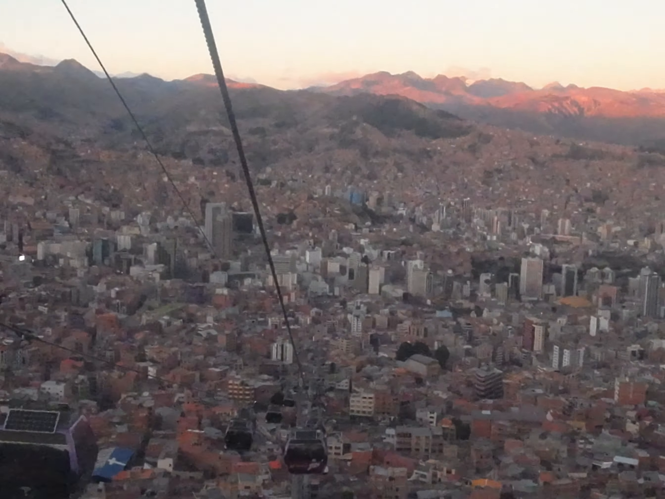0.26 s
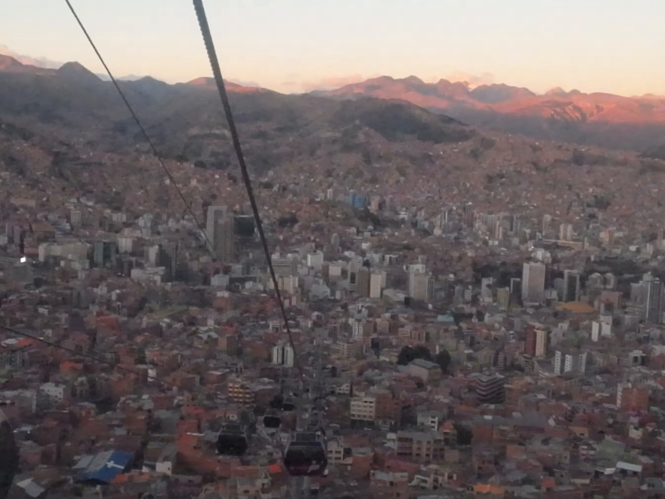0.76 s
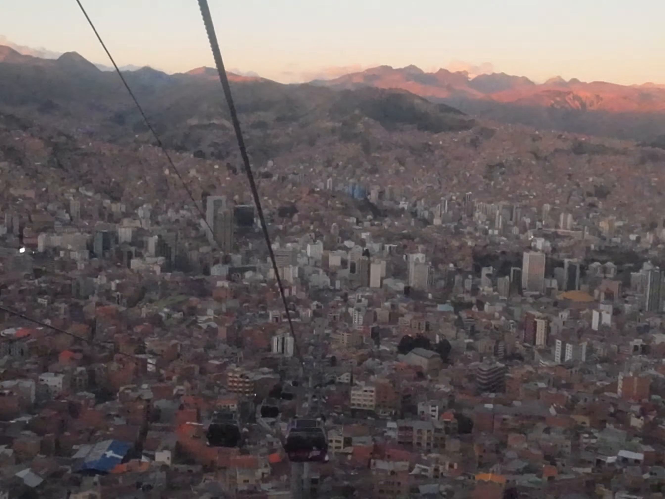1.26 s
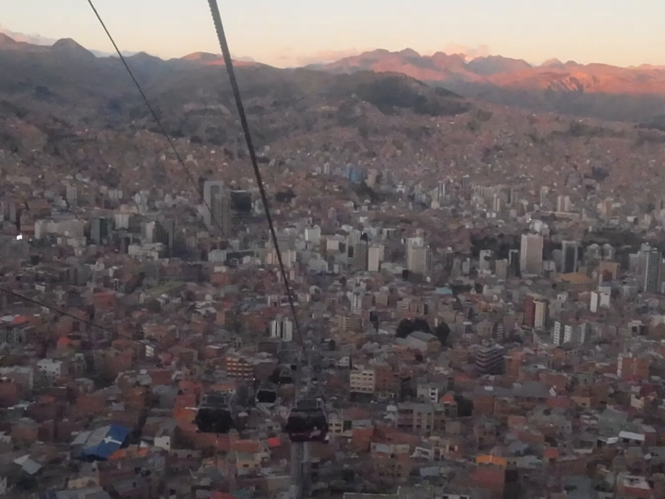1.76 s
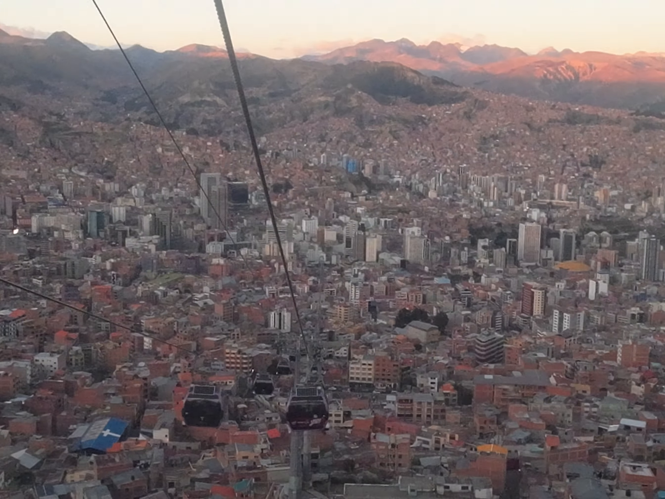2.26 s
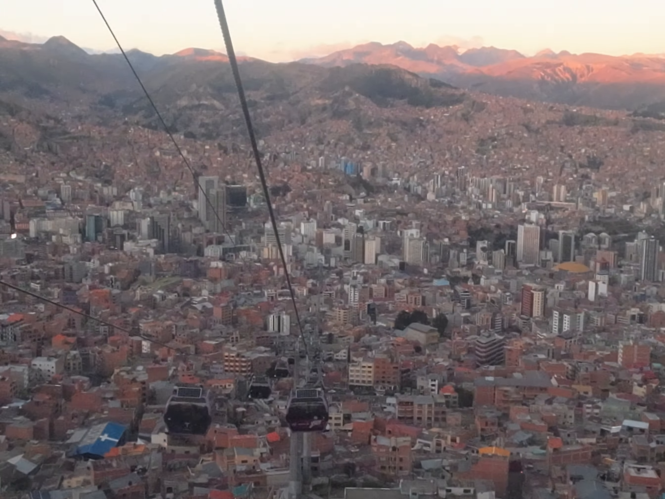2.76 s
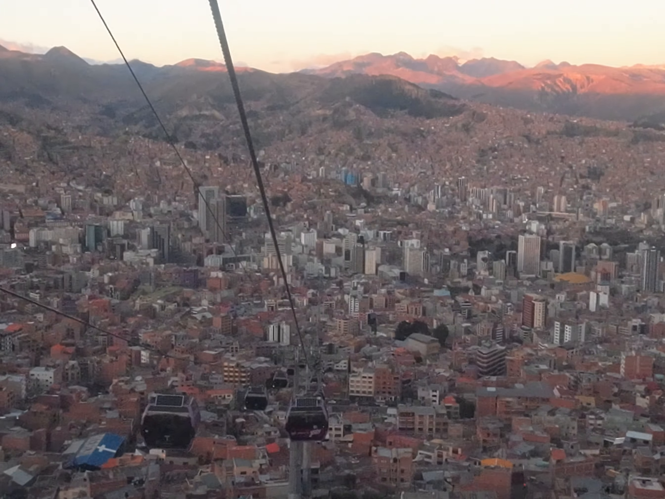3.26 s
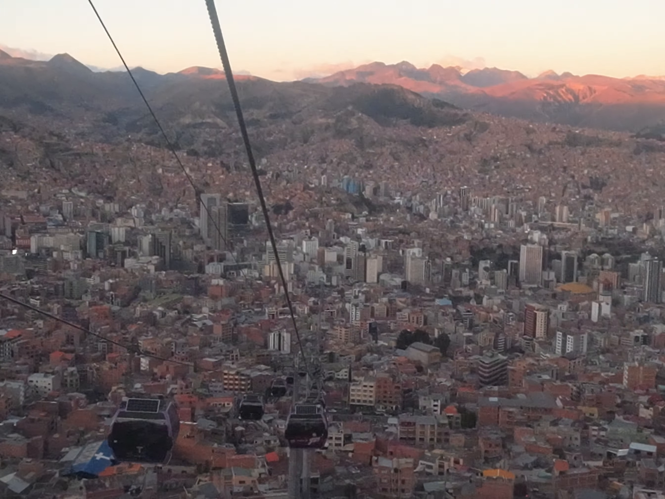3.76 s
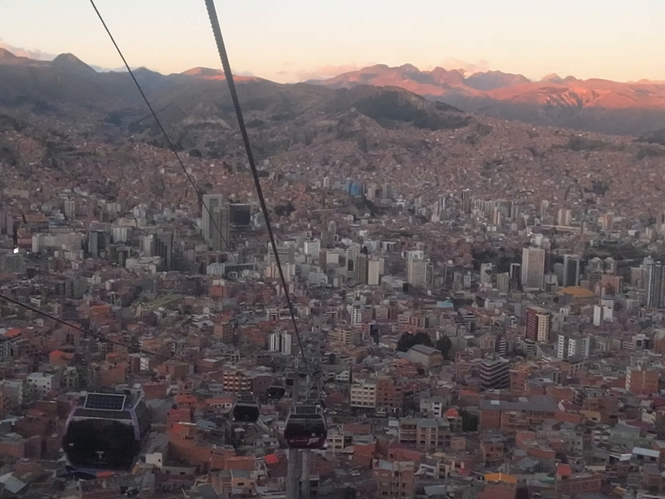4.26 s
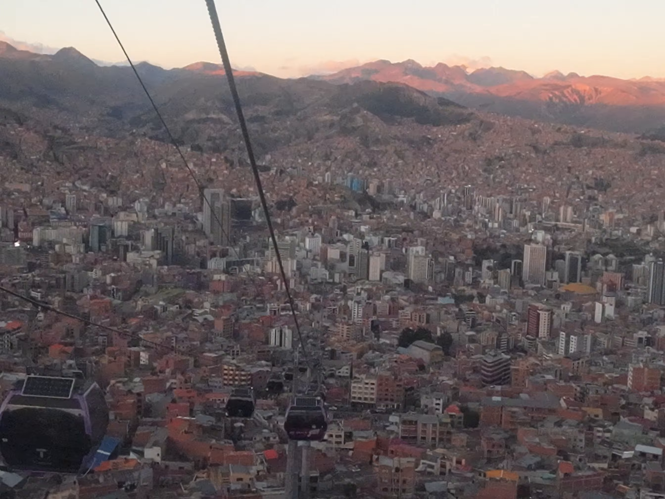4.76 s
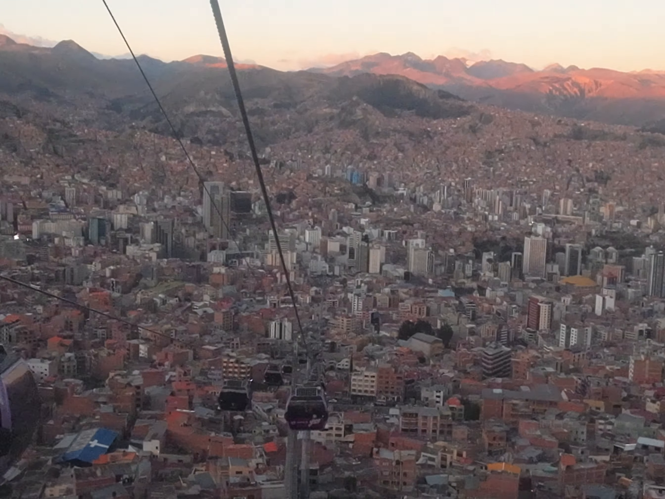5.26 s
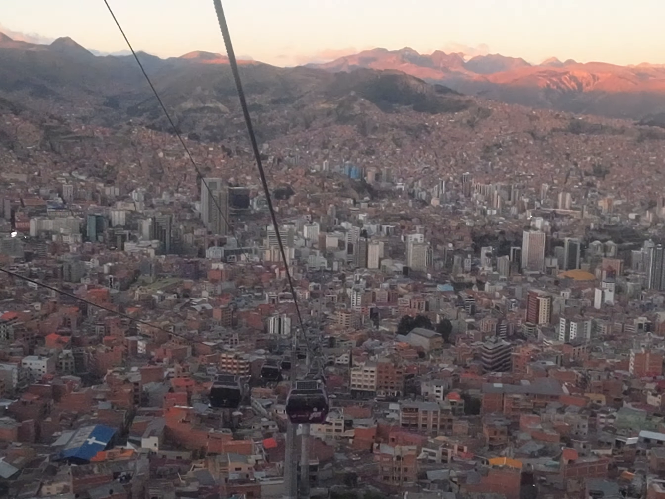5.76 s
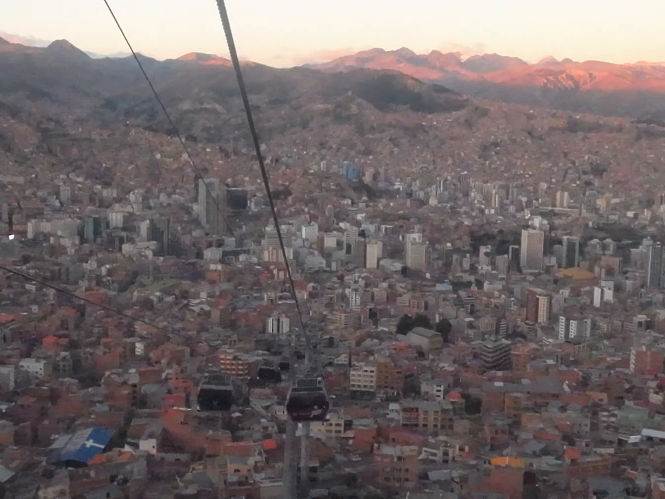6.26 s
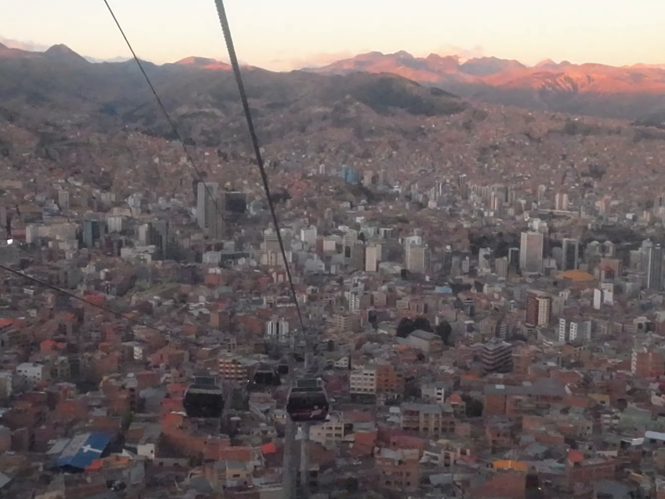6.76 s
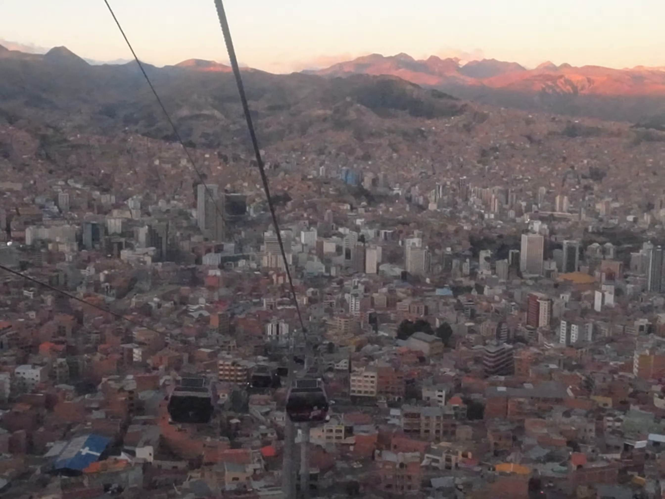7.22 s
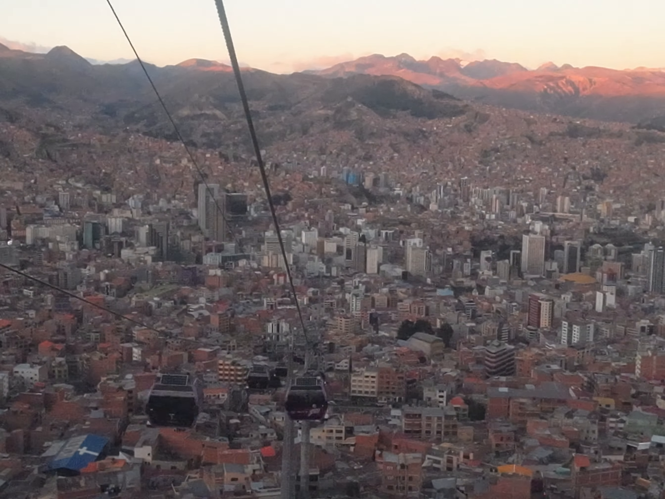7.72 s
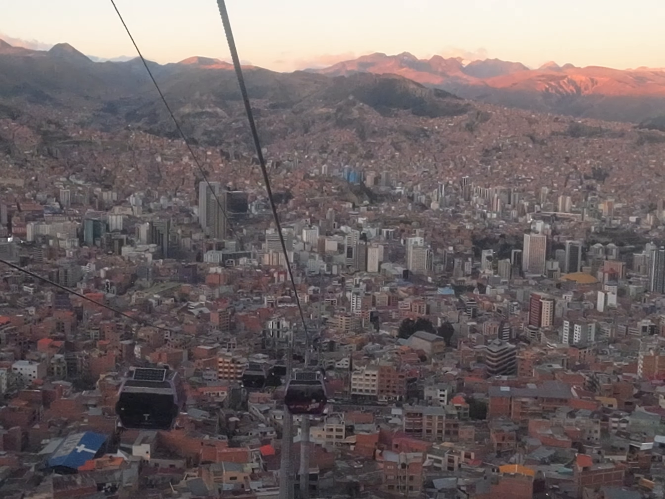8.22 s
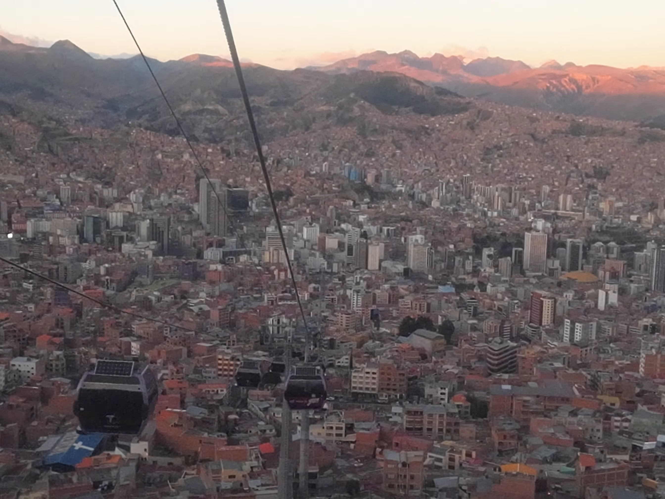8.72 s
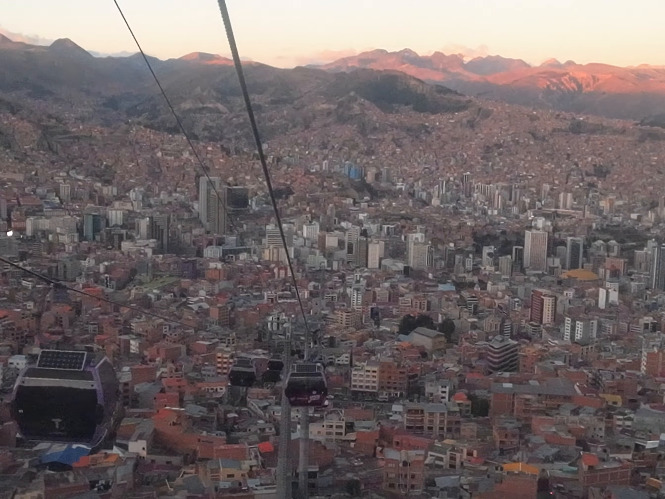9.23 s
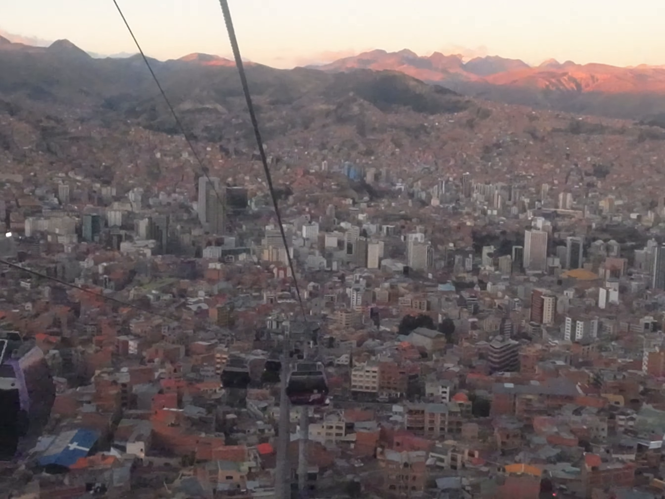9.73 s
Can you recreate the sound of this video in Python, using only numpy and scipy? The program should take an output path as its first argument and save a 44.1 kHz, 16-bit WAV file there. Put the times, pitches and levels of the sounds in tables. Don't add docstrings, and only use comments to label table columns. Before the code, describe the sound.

Heard from inside a small gondola cabin by a handheld stereo microphone: a deep shaking hum, slowly beating rope tones and a dull hollow drone of the shell. Just after six seconds a jolt sets loose panels and fittings rattling rapidly for about a second. The rope hum is thinner afterwards, with scattered trim ticks, a sharper click past eight seconds, and soft cloth rustling close by.

```python
import sys
import numpy as np
from scipy import signal
from scipy.fft import rfft, irfft, next_fast_len
from scipy.io import wavfile
from scipy.ndimage import uniform_filter1d

SR = 44100
rng = np.random.default_rng(int(sys.argv[2]) if len(sys.argv) > 2 else 0)


def file_out(sig):
    cols = np.atleast_2d(sig).T
    lim = np.clip(cols, -1, 1)
    pcm = np.round(lim * 32767).astype(np.int16)
    wavfile.write(sys.argv[1], SR, pcm)


def invert_db(level):
    return 10 ** (np.asarray(level, dtype=float) / 20)


N = 440559
T = np.arange(N) / SR
M = next_fast_len(N)
HZ = np.arange(M // 2 + 1) * SR / M + 1e-3

# time in seconds, level in dB.
SHAKE_LEVEL = [(0, -32), (.8, -21), (1.7, -28.5), (2.5, -21.5), (4.05, -31.5), (4.4, -17.5), (6.05, -21.5),
               (6.22, -25), (6.33, -13), (6.56, -11), (6.7, -20.5), (6.9, -9.5), (7.27, -27.5), (7.48, -17),
               (7.63, -33), (7.76, -18), (8.43, -26), (9.35, -22.5)]
# pitch in Hz, sag in Hz per second before the rise,
# late rise in Hz, level against its control in dB, wander in dB. All tables of tones share these columns.
SHAKE_TONES = [(30.12, 0.00082, 0.0051, -1, 1.0)]
SWAY_TONES = [(26.55, 0.00043, 0.45, -0.8, 5)]
SWAY_DB, SWAY_FADE_DB, SWAY_SHARE = -28, -6.5, .15
RISE_FROM_S, RISE_S, DRIFT_SHARE = 6.0, 3, .0025

# time in seconds, main strands in dB, upper strand in dB.
ROPE_LEVEL = [(0, -19, -22.5), (.6, -22, -35), (.95, -20.5, -21), (1.25, -21.5, -31), (1.55, -15, -40),
              (2.15, -21.5, -27.5), (2.65, -21.5, -21.5), (3.1, -16.5, -37.5), (4.05, -22.5, -34),
              (4.7, -22, -27.5), (5, -20.5, -38.5), (5.65, -28, -26), (6.25, -30.5, -34), (6.9, -32, -38),
              (7.2, -37, -30.5), (8.1, -34.5, -34), (9.1, -30.5, -34.5), (9.99, -33.5, -42)]
# time in seconds, lower overtone in dB, higher overtone in dB.
OVERTONE_LEVEL = [(0, -24.5, -37.5), (.35, -26, -36.5), (.65, -34.5, -37), (.95, -27.5, -34),
                  (1.55, -29, -33), (2.5, -35, -33.5), (3.1, -31, -39), (3.78, -24, -39.5),
                  (4.06, -39, -34), (4.7, -40.5, -39.5), (5.3, -32, -33.5), (5.95, -31.5, -36),
                  (6.6, -43, -37.5), (7.5, -42, -36.5), (8.05, -42, -50), (8.6, -41.5, -43),
                  (9.05, -37, -30), (9.99, -49.5, -33.5)]
# time in seconds, level in dB.
TOP_OVERTONE_LEVEL = [(0, -42), (2, -51.5), (5, -47), (5.6, -41.5), (6.5, -37.5), (7, -49.5), (8, -29.5),
                      (8.5, -35.5), (9, -47.5), (9.99, -55)]
STRAND_TONES = [(88.08, .3, 3.225, -1, 2.1), (83.3, .3, 1.495, -6, 3)]
UPPER_TONES = [(97.23, 0.0, 0.33, 0.0, 2.2)]
LOW_OVERTONE_TONES = [(175.1, .45, 0.624, -1, 2.5), (170, 0.49, 1.5, -10.5, 1.4)]
HIGH_OVERTONE_TONES = [(180.2, .25, 1.58, 0.00057, 1)]
TOP_TONES = [(183.5, 0.00021, 0.0022, 0.002, 0.97)]
THIRD_TONES = [(269, .3, 3.05, -0.5, 3), (261, .5, 3.3, -6, 3)]
THIRD_DB, THIRD_SHARE = -57.5, 0.89

# frequency in Hz, density in dB
# per Hz.
SHELL_DENSITY = [(15, 12), (38, 2), (48, 7), (70, 6), (90, 12), (130, -2), (160, -5), (185, 6),
                 (120, -20.5), (200, -3.5), (231, -9.5), (321, -14), (471, -14), (690, -16.5), (798, -24),
                (1130, -25.5), (2420, -45), (2850, -46), (8500, -58.5), (12900, -63.5), (15500, -93)]
# frequency in Hz, width in Hz, level above the drone in dB.
PANEL_MODES = [(107.8, 2.5, 6.3), (146.2, 11, 8.9), (268, 11, 1.9), (365, 16, 2.6), (528, 10, 1.6),
               (678.3, 35, 10.4), (717, 26, 9.4), (903, 11, 6.5), (1160, 23, 1.6), (1240, 18, 8),
               (2127, 120, 6), (1335, 11, 5), (2820, 54, 3.6), (3840, 520, 1.9)]
# time in seconds, drone strength in dB.
LOAD = [(0, -5), (.3, 0), (.55, 1.5), (1.7, 0), (2, -5), (2.3, 3), (3, -3.5), (3.3, 5.5), (3.8, 3),
        (4.15, -4.5), (5, 0), (5.35, 4), (5.7, -1), (7.5, -1), (7.9, 0), (8.75, 0.5), (9.3, -3.5),
        (9.99, 0)]
# time in seconds, peak in dB.
NUDGES = [(0.409, -35.5), (0.597, -36.5), (0.648, -42.5), (0.863, -39.5), (1.076, -41.5), (1.228, -42.5),
          (1.351, -39.5), (2.176, -33.5), (2.386, -38.5), (2.52, -33.5), (2.644, -34), (2.73, -39.5),
          (2.858, -45.5), (3.255, -36.5), (3.448, -37), (3.554, -41), (3.613, -38), (3.733, -41),
          (4.031, -40.5), (4.225, -42), (4.371, -40), (4.452, -34), (4.646, -39), (5.286, -33),
          (5.414, -36), (5.553, -40.5), (5.63, -42), (5.82, -48), (7.18, -42), (7.33, -43), (7.919, -42),
          (8.061, -45), (8.152, -36), (8.33, -34), (8.46, -37), (8.658, -39), (8.69, -33), (8.74, -43),
          (8.83, -29), (8.93, -32), (9.0, -41), (9.255, -30), (9.366, -28), (9.463, -33), (9.695, -37),
          (9.83, -42)]
SHELL_DB, NUDGE_T60_S, NUDGE_DB, CALM_DB = -44, 0.28, 40, -3
UPPER_SHARE, SETTLE_DB, SETTLE_S = 0.33, 5.5, 0.74
# frequency in Hz, left-right likeness from 0 to 1.
LIKENESS = [(60, 0.94), (130, 1), (290, 0.7), (640, 0.3), (1410, 0.15), (3100, 0.07), (6820, 0.08),
            (15000, 0.3)]
# frequency in Hz, left minus right in dB.
LEAN = [(60, 3.5), (110, -0.5), (200, -0.5), (380, 0.0), (700, 2), (1290, 4.5), (2380, -1), (4400, 0.5),
        (8120, 0.5), (15000, -1)]
PORT_LAG_S = .0001

# time in seconds, level in dB.
JOLT_LEVEL = [(6.2, -61.5), (6.24, -44.5), (6.28, -38), (6.31, -37.5), (6.335, -30), (6.41, -33),
              (6.44, -44), (6.5, -44), (6.58, -51), (6.67, -43.5), (6.78, -49.5), (6.85, -40.5),
              (6.92, -39), (6.97, -47.5), (7.08, -46.5), (7.25, -60)]
# time in seconds, then fitting, frame, bracket and air in dB.
STRIKES = [(6.2337, -63, -61, -71, -70), (6.243, -62, -62, -71, -65.5), (6.2627, -65, -55, -69, -61),
           (6.304, -64, -45, -63, -61), (6.339, -57, -37.5, -52, -55.5), (6.3704, -44, -41.5, -54, -56.5),
           (6.4027, -42, -50, -59, -59), (6.4288, -62, -57.5, -65, -71), (6.459, -50.5, -51, -63, -73),
           (6.4908, -52, -52.5, -62, -73), (6.5251, -52, -53, -58, -69), (6.5916, -51, -53, -68, -72.5),
           (6.6532, -55, -59, -66, -81), (6.6867, -63, -60, -63, -75), (6.721, -52, -54, -71, -75),
           (6.8189, -54, -59, -68, -75), (6.864, -70, -59, -68, -75.5), (6.8867, -48, -62, -64, -69.5),
           (6.9199, -45, -54, -58, -65), (6.9544, -48, -62, -65, -70), (6.99, -51, -58, -56, -71.5),
           (7.0215, -57, -65, -68, -81.5), (7.0554, -57, -60, -67, -77), (7.1194, -55, -61, -70, -76)]
# time in seconds, peak in dB.
KNOCKS = [(6.2397, -34), (6.275, -29.5), (6.3041, -30), (6.33, -35), (6.356, -26.5), (6.39, -41),
          (6.4248, -38.5), (6.46, -44.5), (6.495, -43), (6.5356, -34.5), (6.584, -40), (6.655, -41),
          (6.69, -44), (6.725, -42), (6.784, -40), (6.8149, -41.5), (6.8349, -38.5), (6.8638, -41),
          (6.8918, -40), (6.9092, -37.5), (6.94, -36), (6.97, -38), (7.0, -41), (7.0494, -43),
          (7.1472, -48)]
# time in seconds, peak in dB.
STRAYS = [(0.05, -60), (0.1726, -55), (0.275, -59), (0.468, -58), (0.574, -55), (0.628, -60.5),
          (0.701, -62), (0.7876, -60), (1.187, -57), (1.2526, -54.5), (1.4925, -67.5), (1.5838, -69),
          (1.6353, -54), (1.7143, -54), (2.0925, -61.5), (3.093, -60.5), (3.126, -58), (3.315, -60.5),
          (3.479, -61.5), (2.965, -60), (3.42, -60), (4.82, -60), (5.03, -54), (5.08, -66), (5.27, -64),
          (5.3, -59), (5.532, -51), (.352, -65), (.525, -58), (.89, -63), (1.31, -58.5), (2.16, -62.5),
          (3.19, -62.5), (4.46, -64), (5.59, -62)]
# time in seconds, level in dB.
SNAPS = [(.1, -67.5), (0.251, -71), (.352, -72.5), (.525, -70), (1.585, -69), (2.965, -71.5),
         (5.175, -69.5), (5.585, -69.5), (7.125, -73.5), (7.21, -68.5), (7.297, -70), (7.377, -65.5),
         (7.428, -69.5), (7.528, -64), (8.428, -60.5), (9.469, -69)]
# frequency in Hz, width in Hz, level in dB.
CLATTER_MODES = [(537, 27, -1.5), (711.5, 40, 5), (1136, 52, -3), (1320, 43, -5), (1500, 34, -11),
                 (1660, 44, -12)]
FITTING_MODES = [(6300, 420, 1), (5750, 400, 0.5), (8040, 1200, -1), (8900, 700, -7), (7000, 3500, -13.5)]
LOOSE_MODES = [(4300, 980, -3.5), (6000, 1000, -0.5), (8450, 2000, -8), (7000, 11000, -11)]
FRAME_MODES = [(2040, 50, 0), (2130, 70, 1.5), (2340, 50, -1), (2764, 67, 2), (3190, 80, -3),
               (4210, 300, -9), (2700, 2600, -10.5)]
BRACKET_MODES = [(3800, 170, 6), (4400, 500, -11)]
AIR_MODES = [(10610, 250, 0.5), (11500, 300, 0), (12800, 400, -3.5), (10000, 3500, -3),
             (13300, 2000, -13.5)]

# start in seconds, length in seconds, pitch in
# Hz, level in dB.
RINGS = [(3.11, 0.23, 1088, -57.5), (3.699, 0.097, 1262, -55.5), (5.436, 0.15, 1615, -59.5),
         (5.753, 0.1, 914, -52.5), (5.87, 0.21, 1667, -63), (7.425, 0.051, 860, -41.5),
         (7.62, 0.69, 914, -52), (8.465, 0.073, 1600, -56), (8.85, .065, 1254, -54), (3.84, .06, 1850, -65),
         (3.7, 0.091, 1700, -65), (9.125, .05, 1100, -57), (9.035, 0.048, 1150, -63),
         (9.7, 0.027, 500, -43), (3.95, 0.17, 3100, -80.5), (0.48, .1, 4250, -72.5), (5.275, .04, 694, -45),
         (4, 0.07, 690, -47), (7.495, .03, 780, -48.5), (6.302, 0.032, 2400, -52), (6.34, .028, 2720, -52),
         (6.325, .03, 710, -36), (7.1, 0.06, 705, -35), (6.272, .03, 1250, -46), (9.125, .04, 1420, -56),
         (6.345, .045, 3750, -54), (6.24, 0.022, 1700, -52), (6.455, .04, 3850, -64),
         (6.49, .03, 3800, -65), (6.525, .05, 3800, -65), (6.655, .025, 3750, -66), (6.688, .03, 3800, -65),
         (6.915, .03, 3800, -65), (6.99, .035, 3800, -63), (5.2, 0.33, 540, -48), (5.6, 0.28, 600, -58),
         (7.7, .08, 515, -42), (8.4, .1, 510, -47), (5.2, .2, 170, -48), (7.29, 0.016, 450, -41),
         (8.1, .016, 1620, -54), (6.455, .025, 2130, -59), (6.535, .03, 2050, -61), (6.88, .02, 2000, -59),
         (6.83, .025, 1500, -54), (6.93, .07, 1250, -50), (9, 0.043, 1000, -49), (8.85, 0.018, 2200, -60)]

# time in seconds, peak in dB, top part in dB, left minus right in dB.
TICKS = [(6.0022, -47.5, -51.5, -1.5), (6.7858, -41, -50.5, 0), (7.2146, -49, -75, -11),
         (7.295, -44, -72.5, -8), (7.3775, -42, -68, -5.5), (7.428, -38.5, -63, 1),
         (7.528, -60, -55.5, 9.5), (8.2095, -46.5, -59.5, -2), (8.4283, -29, -48.5, 2),
         (8.8248, -47, -75, -10.5), (8.852, -46, -77, -6), (9.027, -45.5, -72, -6.5),
         (9.364, -59, -67.5, 0), (9.469, -55, -63.5, 0), (5.79, -55.5, -79, -2), (6.012, -49, -66, 1),
         (7.211, -54, -76, 0), (7.298, -32, -80, -1), (7.312, -59, -76, 0), (8.21, -42, -75.5, 1),
         (8.789, -52, -78.5, 0), (9.127, -35.5, -71, 1.5), (9.16, -62, -75, -2), (9.235, -61, -76, -2),
         (7.373, -43, -75, -4), (8.2095, -47, -75.5, -2), (6.793, -44, -76, 0), (7.429, -59, -75, 0),
         (8.36, -38, -80, 0), (9.14, -46, -82, 0)]
TICK_HZ = [2920, 3700, 2500, 1600, 2540, 1864, 5700, 3360, 1890, 2230, 2240, 2160, 4000, 4540, 2800, 4300,
           4500, 450, 4500, 1380, 2200, 1310, 3000, 5600, 1400, 2000, 1500, 5300, 500, 1350]

# time in seconds, strength in dB, centre of the fine hiss in Hz.
RUSTLE = [
    (7.2, -68.5, 9000),
    (7.62, -62, 10470),
    (7.95, -62, 9560),
    (8.2, -62, 7960),
    (8.33, -68.5, 8550),
    (8.72, -63.5, 8580),
    (8.9, -68, 8480),
    (9.55, -66, 9200),
    (9.85, -61.5, 9450),
]
FINE_UNDER_DULL_DB = -7
HISS_DB = -84


def level(x, db):
    return x * invert_db(db) / np.sqrt(np.mean(x ** 2))


def curves(table, silent_db=None):
    s, *columns = np.transpose(table)
    return [np.interp(T, s, c, silent_db, silent_db) for c in columns]


def shape(table):
    hz, value = np.transpose(table)
    return np.interp(np.log(HZ), np.log(hz), value)


def peak(hz, width):
    return 1 / (1 + 1j * (HZ / hz - hz / HZ) * hz / width)


def ringing(modes, top_hz=10500):
    power = sum(invert_db(db) ** 2 * abs(peak(hz, width)) ** 4 for hz, width, db in modes)
    return np.sqrt(power / (1 + (HZ / top_hz) ** 10))


def filt(x, gain):
    return irfft(rfft(x, M) * gain, M)[..., :N]


def walk(rate):
    k = int(SR / rate)
    held = np.repeat(rng.standard_normal(N // k + 1), k)
    return 1.2 * uniform_filter1d(uniform_filter1d(held, k), k)[:N]


def bursts(times, gains, t60):
    hits = np.zeros(N)
    hits[(np.asarray(times) * SR).astype(int)] = gains
    return signal.lfilter([1], [1, -np.exp(-np.log(1000) / (t60 * SR))], hits)


def stereo_noise():
    a, b = rfft(rng.standard_normal((2, M)))
    like = np.clip(shape(LIKENESS), 0, 1)
    lean = invert_db(shape(LEAN) / 2)
    left = a * lean * np.exp(-2j * np.pi * HZ * PORT_LAG_S)
    right = (like * a + np.sqrt(1 - like ** 2) * b) / lean
    return np.array([left, right])


def tones(control_db, table, lean_db, skew):
    sides, out, phases = np.array([[.5], [-.5]]), 0, []
    rise = np.clip((T - RISE_FROM_S) / RISE_S, 0, 1)
    before_s = np.minimum(T, RISE_FROM_S)
    for hz, sag_hz, rise_hz, db, wander_db in table:
        glide = hz - sag_hz * before_s + rise_hz * rise
        pitch = glide * (1 + DRIFT_SHARE * walk(3))
        phase = 2 * np.pi * np.cumsum(pitch) / SR + len(phases) * np.pi / 2
        phases.append(phase)
        gain = invert_db(control_db + db + wander_db * walk(6.5) + lean_db * sides)
        out = out - np.sqrt(2) * gain * np.cos(phase + skew * walk(0.98) * sides)
    return out, phases[0]


def cabin_shake():
    shake_db, = curves(SHAKE_LEVEL)
    shake, phase = tones(shake_db, SHAKE_TONES, 1.7, .04)
    follow_db = SWAY_SHARE * (shake_db - shake_db.mean())
    sway_db = SWAY_DB + follow_db + SWAY_FADE_DB * np.clip(T - 7.8, 0, 1)
    sway = tones(sway_db, SWAY_TONES, 1.7, .04)[0]
    return shake + sway, phase


def rope_hum():
    strand_db, upper_db = curves(ROPE_LEVEL)
    low_db, high_db = curves(OVERTONE_LEVEL)
    top_db, = curves(TOP_OVERTONE_LEVEL)
    third_db = THIRD_DB + THIRD_SHARE * (strand_db - strand_db.mean())
    hum = tones(strand_db, STRAND_TONES, .3, .15)[0]
    hum = hum + tones(upper_db, UPPER_TONES, .3, .15)[0]
    hum = hum + tones(low_db, LOW_OVERTONE_TONES, -.2, 0.44)[0]
    hum = hum + tones(high_db, HIGH_OVERTONE_TONES, -.2, 0.25)[0]
    hum = hum + tones(top_db, TOP_TONES, -.2, 0.25)[0]
    return hum + tones(third_db, THIRD_TONES, -.2, 0.5)[0]


def shell_drone(shake_phase):
    modes = sum(invert_db(db) ** 2 * abs(peak(hz, w)) ** 4 for hz, w, db in PANEL_MODES)
    noise = stereo_noise() * invert_db(shape(SHELL_DENSITY)) * np.sqrt(1 + modes)
    noise /= np.sqrt(2 * np.mean(np.sum(abs(noise[:, HZ > 200]) ** 2, axis=1))) / M
    panel_db, = curves(LOAD)
    upper_db = UPPER_SHARE * panel_db + SETTLE_DB * np.exp(-T / SETTLE_S)

    panel = abs(peak(695, 91)) ** 2
    out = irfft(noise * panel, M)[:, :N] * invert_db(panel_db + 2 * walk(14))
    nudge_s, nudge_db = np.transpose(NUDGES)
    flare = bursts(nudge_s, invert_db(nudge_db + NUDGE_DB), NUDGE_T60_S)
    out *= invert_db(CALM_DB) + uniform_filter1d(flare, size=250)

    noise *= np.sqrt(1 - panel ** 2)
    rope_db = curves(ROPE_LEVEL)[0]
    for k in range(13):
        band = np.cos(np.pi / 2 * np.clip(np.log2(HZ / 30) * 1.3 - k, -1, 1))
        if k < 4:
            load_db = 0.29 * (rope_db - rope_db.mean())
        else:
            load_db = upper_db * (.8 if k > 5 else .4)
        buzz_db = min(k / 8, 1) * 1.4 * np.sin(shake_phase)
        out = out + irfft(noise * band, M)[:, :N] * invert_db(load_db + 1.7 * walk(7.6) + buzz_db)
    return out * invert_db(SHELL_DB)


def fitting_rattle():
    s, fitting_db, frame_db, bracket_db, air_db = np.transpose(STRIKES)
    snap_s, snap_db = np.transpose(SNAPS)
    stray_s, stray_db = np.transpose(STRAYS)
    knock_s, knock_db = np.transpose(KNOCKS)
    jolt_db, = curves(JOLT_LEVEL, silent_db=-88.0)
    grain = irfft(stereo_noise(), M)[:, :N] * invert_db(1.5 * walk(300))
    grain /= grain.std()

    blows = grain * (.6 + bursts(s, 0.8, 0.3))
    low = level(filt(blows, ringing(CLATTER_MODES[:2] + [(386, 430, -6.0)])), -5.0)
    knocks = uniform_filter1d(bursts(knock_s, invert_db(knock_db), 0.26), size=120)
    high = filt(grain * knocks, ringing(CLATTER_MODES[2:] + [(1370, 390, -14)]))

    chance = rng.random((400, 2))
    crackle_db = -72.0 - 4.4 * np.log10(chance[:, 1])
    crackle = bursts(chance[:, 0] * T[-1], invert_db(crackle_db), 0.073)
    faint = crackle + bursts(stray_s, invert_db(stray_db - 2.0), 0.084)
    strikes = bursts(s, invert_db(fitting_db - 2.5), 0.12)
    fittings = filt(grain * strikes, ringing(FITTING_MODES)) + filt(grain * faint, ringing(LOOSE_MODES))

    bracket = filt(grain[::-1] * bursts(s, invert_db(bracket_db + 7.0), 0.19), ringing(BRACKET_MODES))
    frame_hits = uniform_filter1d(bursts(s, invert_db(frame_db), 0.2), size=300)
    frame = filt(grain * frame_hits, ringing(FRAME_MODES))
    splashes = bursts(s, invert_db(air_db), 0.15) + bursts(snap_s, invert_db(snap_db), 0.091)
    air = filt(grain[:, ::-1] * splashes, ringing(AIR_MODES, top_hz=14000))

    panels = invert_db(jolt_db) * low + invert_db(14) * high
    return panels + invert_db(3.5) * fittings + bracket + invert_db(10.5) * frame + invert_db(10.0) * air


def brief_rings():
    out = np.zeros((2, N))
    for s, length, hz, db in RINGS:
        i, n = int(s * SR), int(length * SR)
        wobble = uniform_filter1d(uniform_filter1d(rng.standard_normal((2, n)), 400), 200) * 20
        unsteady = (.6 + 1.2 * (hz > 2500)) * wobble[0]
        phase = 2 * np.pi * hz * T[:n] + unsteady + rng.uniform(0, 4, (2, 1))
        gain = invert_db(db + 3 + 2.5 * np.clip(wobble[1], -2, 1)) * np.hanning(n) ** .6
        out[:, i:i + n] += gain * np.sin(phase)
    return out


def trim_ticks():
    size, lead = 4096, 32
    out, t = np.zeros((2, N + size)), T[:size]
    hz = np.fft.rfftfreq(size, 1 / SR) + 1
    decay = (np.exp(-t / .002) + invert_db(-12) * np.exp(-t / .014)) * (t > lead / SR)
    for (s, db, top_db, pan_db), centre_hz in zip(TICKS, TICK_HZ):
        one, two = rng.standard_normal((2, size)) * decay
        one *= .55
        one[lead + 1] += 6
        ports = np.array([one + 0.43 * two, one - 0.63 * two])

        ring = 1 / (1 + 4.5j * (hz / centre_hz - centre_hz / hz)) ** 2
        knock = 1 / abs(1 + .75j * (hz / 2900 - 2900 / hz)) ** 3
        knock_gain = min(0.3 * invert_db(top_db - db + 21.5), .6)
        body = invert_db(db + 10.0) * np.hypot(1.4 * abs(ring), knock_gain * knock)
        top = invert_db(top_db + 10.0) / (1 + .8j * (hz / 7000 - 7000 / hz)) ** 4
        response = np.hypot(body, abs(top)) * ring / abs(ring) / (1 + (hz / 13500) ** 6)

        pan = invert_db(np.array([[pan_db], [-pan_db]]) / 2)
        i = int(s * SR) - lead
        out[:, i:i + size] += irfft(rfft(ports) * response) * (t < .07) * pan
    return out[:, :N]


def cloth_rustle():
    dull_db, centre_hz = curves(RUSTLE)
    fine_db = dull_db + FINE_UNDER_DULL_DB
    onset = np.clip((T - RUSTLE[0][0]) * 10, 0, 1)
    noise = rng.standard_normal((2, N)) * invert_db(2.5 * walk(60)) * onset
    dull = level(filt(noise, peak(2600, 3600) ** 2), -5.5)
    carrier = np.cos(2 * np.pi * np.cumsum(centre_hz) / SR)
    narrow = level(filt(noise, 1 / (1 + (HZ / 1100) ** 4)), -7.0) * carrier
    broad = level(filt(noise, peak(6500, 12000) ** 3 / (1 + (HZ / 12000) ** 6)), -7.5)
    return invert_db(dull_db) * dull + invert_db(fine_db) * (narrow + broad)


def scene():
    shake, shake_phase = cabin_shake()
    moving = shake + rope_hum() + shell_drone(shake_phase)
    return moving + fitting_rattle() + brief_rings() + trim_ticks() + cloth_rustle()


def low_pass(x):
    return signal.sosfilt(signal.butter(12, 15710, fs=SR, output="sos"), x)


def record(dry):
    hiss = invert_db(HISS_DB) * rng.standard_normal(dry.shape)
    fade = np.clip(np.minimum(T + .0017, T[-1] - T) / .004, 0, 1)
    return low_pass((dry + hiss) * fade)


dry = scene()
out = record(dry)
file_out(out)
```